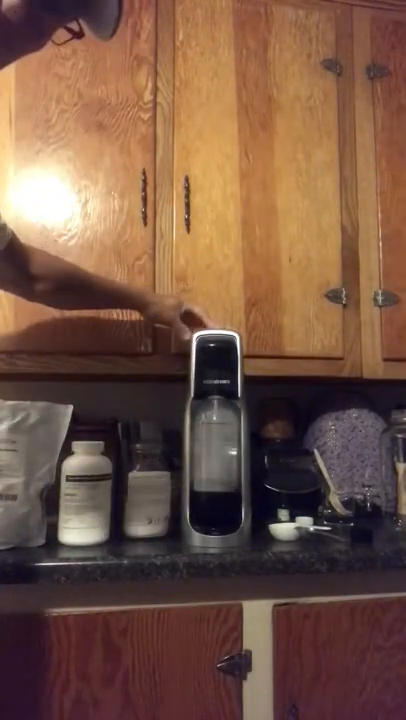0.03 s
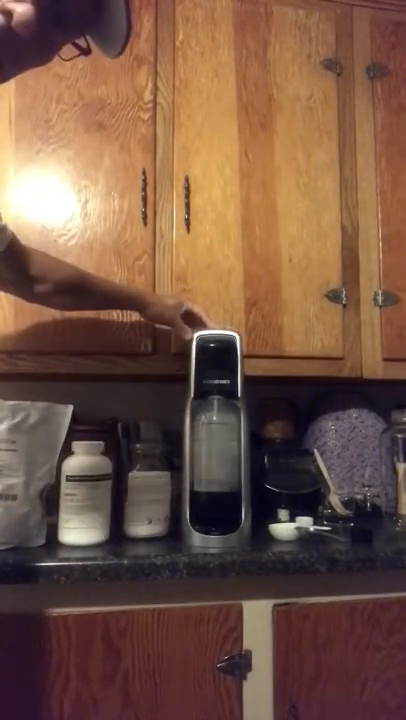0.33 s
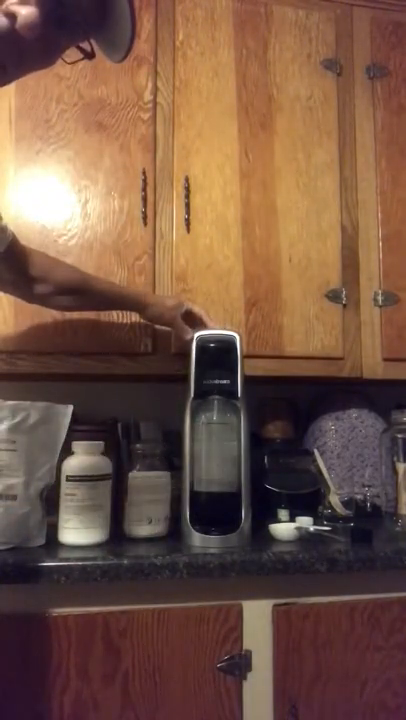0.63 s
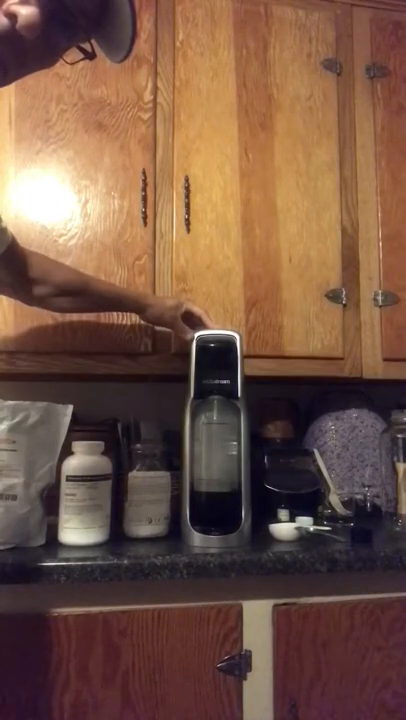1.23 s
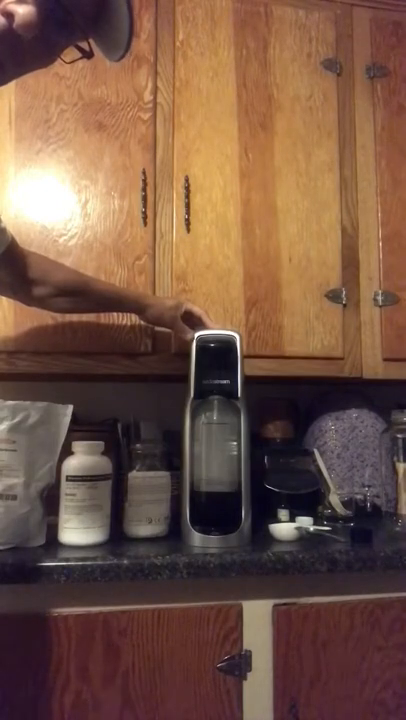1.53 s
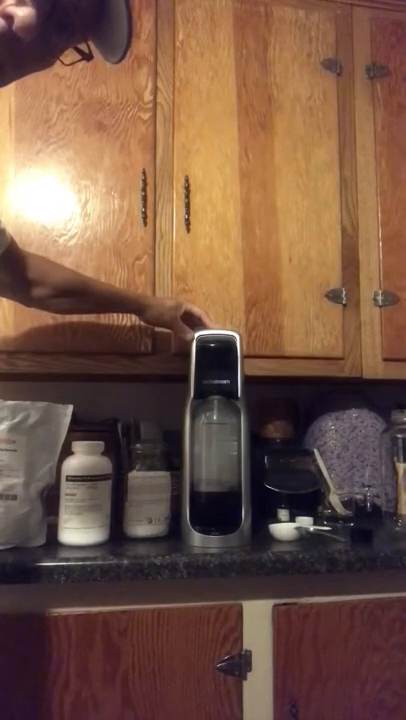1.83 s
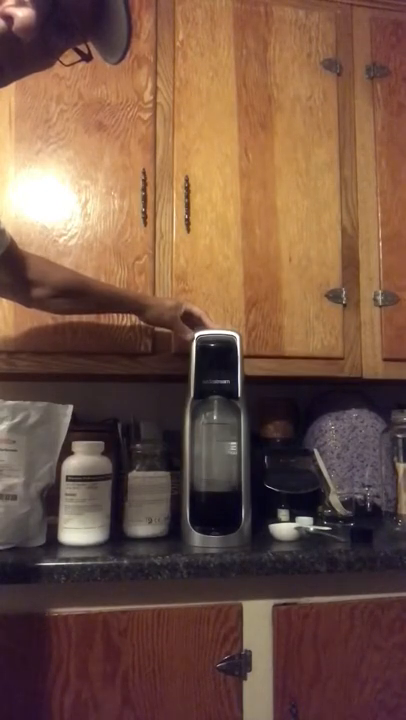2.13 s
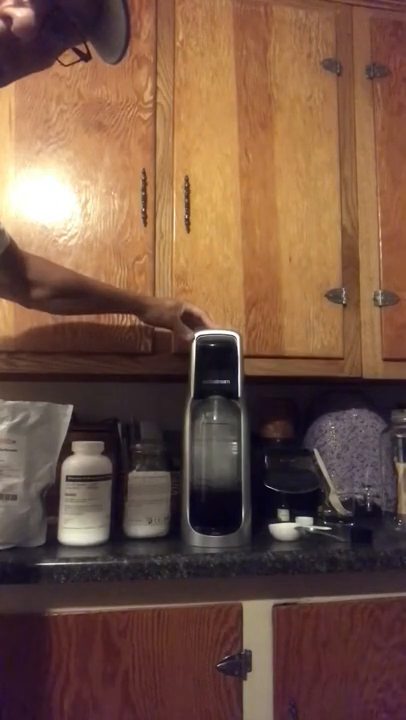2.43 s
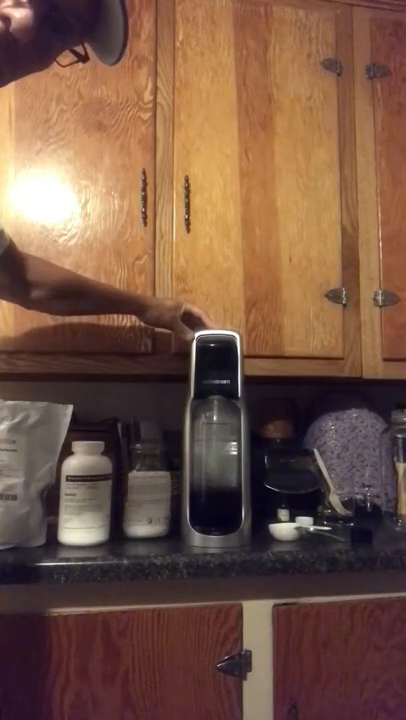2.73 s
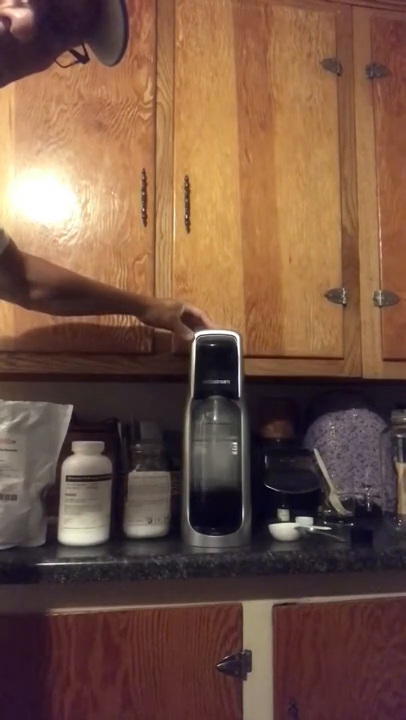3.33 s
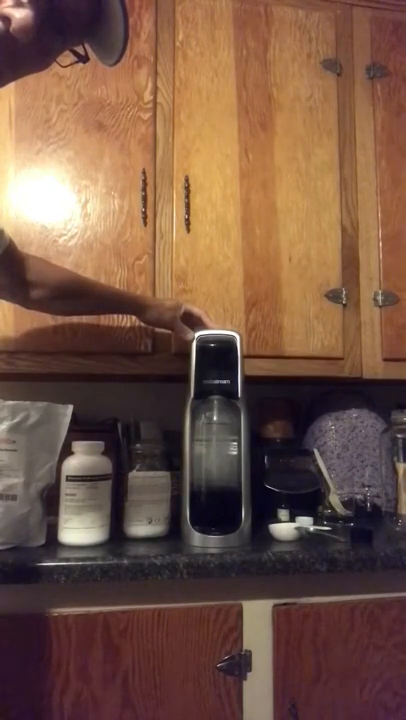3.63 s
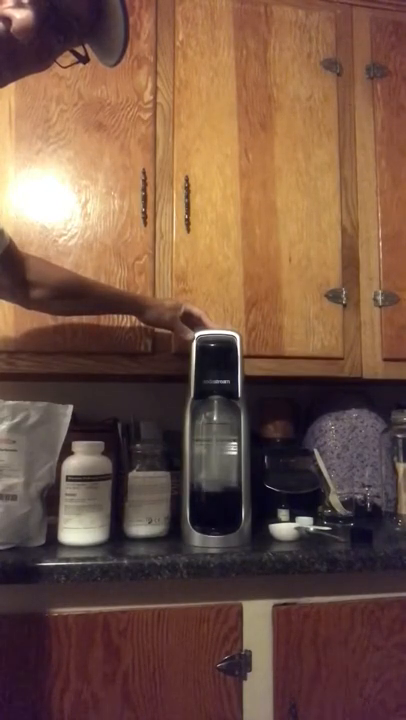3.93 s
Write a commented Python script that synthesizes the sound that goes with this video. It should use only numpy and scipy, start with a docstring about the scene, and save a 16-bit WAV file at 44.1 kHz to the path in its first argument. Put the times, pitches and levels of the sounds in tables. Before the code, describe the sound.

Gas from a soda maker bubbles through bottled water in a small kitchen. Larger ringing bubbles gurgle at first, then give way to brighter fizzing and brief spurts, over a faint valve hiss.

```python
"""A jet of gas from a countertop carbonator breaks into a dense, spluttering cloud of ringing bubbles
in a bottle of water. As pressure builds, the large bubbles thin out and the fine fizz grows.
Each bubble is a short, damped tone, coloured by the bottle and a small kitchen.
Behind the jet the valve hisses thinly, the water churns, and mains hum lies underneath."""
import sys
import numpy as np
from scipy import signal
from scipy.fft import rfft, irfft, next_fast_len
from scipy.io import wavfile
from scipy.ndimage import uniform_filter1d, map_coordinates

SR = 44100
rng = np.random.default_rng(int(sys.argv[2]) if len(sys.argv) > 2 else 0)


def digitize_waveform(pressure):
    """Quantize a signal to 16-bit integers and store it at the path in sys.argv[1].

    Rows of a 2-D input are taken as channels; values are limited to [-1, 1].
    """
    field = np.atleast_2d(pressure).T
    bounded = np.clip(field, -1, 1)
    quanta = np.round(bounded * 32767).astype(np.int16)
    wavfile.write(sys.argv[1], SR, quanta)


N = 176400


def amp(db):
    """Gain of a level in dB."""
    return 10 ** (np.asarray(db) / 20)


def unit(x):
    """x at rms 1."""
    return x / np.sqrt(np.mean(x ** 2) + 1e-20)


def along(points, hz):
    """A curve of (f/Hz, value) points, read on a log frequency axis."""
    freqs, values = np.transpose(points)
    return np.interp(np.log(hz + 1), np.log(freqs + 1), values)


def clock():
    """Time of every sample in seconds."""
    return np.arange(N) / SR


def fader(rows):
    """Gain per sample from (t/s, level/dB) breakpoints."""
    return amp(np.interp(clock(), *np.transpose(rows)))


def swell(s, sigma_s):
    """A bell-shaped envelope centred on time s."""
    return np.exp(-.5 * ((clock() - s) / sigma_s) ** 2)


def wobble(rate):
    """Smooth random modulation, rate knots a second."""
    return map_coordinates(rng.standard_normal(4096), [np.arange(N) * rate / SR], mode="wrap")


def filtered(x, response):
    """x through a frequency response."""
    size = next_fast_len(N + SR // 4)
    return irfft(rfft(x, size) * response(np.fft.rfftfreq(size, 1 / SR)), size)[:N]


def coloured(x, eq):
    """x through an EQ curve, rolled off an octave above its last point, at rms 1."""
    return unit(filtered(x, lambda hz: amp(along(eq, hz)) / (1 + (hz / (2 * eq[-1][0])) ** 10)))


def noise_band(hz, width_hz):
    """A narrow, ringing band of noise at rms 1."""
    phase = 2 * np.pi * np.cumsum(hz * np.ones(N)) / SR
    return unit(wobble(width_hz) * np.cos(phase) + wobble(width_hz) * np.sin(phase))


def glide(start, end, from_hz, to_hz, width_hz):
    """A band of noise that swells and fades while its pitch slides."""
    t = np.arange(max(int((end - start) * SR), 2)) / SR
    progress = t / t[-1]
    a, b = (map_coordinates(row, [t * width_hz], mode="wrap") for row in rng.standard_normal((2, 512)))
    phase = 2 * np.pi * np.cumsum(from_hz + (to_hz - from_hz) * progress) / SR
    band = np.sin(np.pi * progress) * unit(a * np.cos(phase) + b * np.sin(phase))
    return np.bincount(max(int(start * SR), 0) + np.arange(len(t)), band, N)[:N]


def clustered(x, depth_db=1.8):
    """Bubbles of like size come in clusters: brief patches of random gain in time and pitch."""
    spectra = signal.stft(x, nperseg=512)[2]
    patches = uniform_filter1d(rng.standard_normal(spectra.shape), size=5, axis=0)
    patches = uniform_filter1d(patches, size=4, axis=1)
    return unit(signal.istft(spectra * amp(depth_db * unit(patches)), nperseg=512)[1][:N])


def climbing(x, share):
    """Varispeed: the pitch of x drifts up by a share over its whole length."""
    progress = clock() / (N / SR)
    return map_coordinates(x, [N * (progress + share * progress * (progress - 1) / 2)], mode="wrap")


def steadied(x, window_s=.07):
    """A leveller, slower than the splutter: holds x near rms 1 so that a fader sets its swells."""
    power = uniform_filter1d(x ** 2, size=int(window_s * SR))
    power = uniform_filter1d(power, size=int(window_s * SR / 2))
    return x / np.sqrt(np.abs(power) + 1e-9)


# Reverb time of the kitchen: f/Hz, t60/s
KITCHEN_DECAY = [(200, 0.99), (2000, 0.26), (10000, 0.23)]


def kitchen(x, wet_db=-2):
    """Adds a short, diffuse kitchen reverb, its noise tail renewed every half second."""
    mix = np.pad(x, (0, SR))
    for s in np.arange(0, N / SR + .5, .5):
        hz, t, spectra = signal.stft(rng.standard_normal(SR // 4), SR, nperseg=256)
        decay = amp(-60 * t / along(KITCHEN_DECAY, hz)[:, None])
        tail = signal.istft(spectra * decay, SR, nperseg=256)[1]
        near = np.arange(max(int((s - .5) * SR), 0), min(int((s + .5) * SR), N))
        send = np.sqrt(np.clip(1 - 2 * np.abs(near / SR - s), 0, 1))  # equal-power crossfade
        echo = signal.fftconvolve(x[near] * send, tail / np.linalg.norm(tail))
        mix[near[0]:near[0] + len(echo)] += amp(wet_db) * echo
    return unit(mix[:N])


# Mains partials: f/Hz, level/dB
HUM_PARTIALS = [(59, -72.5), (118.5, -70.5)]


def hum():
    """Mains hum of a kitchen appliance over a faint room rumble."""
    tones = sum(np.sqrt(2) * amp(db) * np.sin(2 * np.pi * hz * clock() + 0.12 * wobble(6.1))
                for hz, db in HUM_PARTIALS)
    rumble_eq = [(20, 7.0), (52, 4.5), (72, 4), (130, 11), (200, -13), (500, -18.5)]
    return tones + amp(-70) * coloured(rng.standard_normal(N), rumble_eq)


# Churn fader, before trim: t/s, level/dB
CHURN_FADER = [(0, -63), (1.0, -63.5), (2.2, -63), (2.6, -66)]
# Body of the churn: f/Hz, relative level/dB
CHURN_EQ = [(20, -18), (55, -6), (75, -15), (150, -1), (230, 2.5), (440, -3), (560, 8.5), (630, -1),
            (705, -2), (880, -6.5), (1100, -15), (2000, -15)]
# Low drones: f/Hz, width/Hz, level/dB, peak t/s, sigma/s
WATER_DRONES = [(365, 14, -69.5, 2.55, 1.3), (260, 30, -67.5, 0.57, 0.79), (695, 52, -64.5, 0.3, 0.4)]


def water():
    """Churning water: a low bed of noise, narrow swelling drones and one soft bump."""
    churn = amp(0.5) * fader(CHURN_FADER) * coloured(rng.standard_normal(N), CHURN_EQ)
    drones = sum(amp(db) * swell(s, sigma) * noise_band(hz, width)
                 for hz, width, db, s, sigma in WATER_DRONES)
    bump = amp(-59) * swell(s=0.89, sigma_s=0.035) * np.sin(2 * np.pi * 33 * clock())
    return churn + drones + bump


# Swells of the bottle's ring: t/s, peak level/dB, sigma/s
BOTTLE_THROBS = [(.77, -64, 0.033), (2.26, -60.5, 0.054), (2.622, -61.5, 0.055)]


def bottle(ring_hz=374):
    """The lowest ring of the bottle throbs now and then."""
    envelope = sum(amp(db) * swell(s, sigma) for s, db, sigma in BOTTLE_THROBS)
    return envelope * np.sin(2 * np.pi * ring_hz * clock() + 0.46 * wobble(18))


# Hiss fader, before trim and flutter: t/s, level/dB
VALVE_FADER = [(0, -65.5), (0.7, -68.5), (1.9, -66.5), (2.7, -62.5), (2.95, -66), (4.0, -62.5)]
# Airy top of the hiss: f/Hz, relative level/dB
VALVE_EQ = [(5000, -20), (7000, -9), (8000, -6.5), (9200, 0), (9800, -3), (10650, -5), (11000, 2),
            (11650, .5), (11870, -6), (12500, -6), (13200, -9), (14100, -12), (15200, -9), (16000, -12)]


def valve():
    """Thin, fluttering hiss of gas passing the valve."""
    hiss = clustered(coloured(kitchen(rng.standard_normal(N)), VALVE_EQ), depth_db=1.5)
    return fader(VALVE_FADER) * amp(1.15 + 1.2 * wobble(38)) * hiss


# Spray cues: t/s, f/Hz, level/dB
SPRAY_CUES = [(.285, 12400, -69), (.855, 10700, -68), (1.465, 9160, -59), (2.265, 10080, -64),
              (3.23, 9600, -65)]


def sprays(length_s=0.059, rise=.03):
    """Tiny sprays of bursting bubbles, each a bright upward chirp of noise."""
    return sum(amp(db) * glide(s - length_s / 2, s + length_s / 2, hz, hz * (1 + rise), width_hz=740)
               for s, hz, db in SPRAY_CUES)


# Solo bubbles: t/s, f/Hz, peak level/dB, sigma/s
SINGER_CUES = [(0.402, 1470, -38, 0.021), (0.572, 1483, -40, 0.028), (2.816, 1476, -46, 0.012),
               (3, 3400, -31.5, 0.0098), (3.226, 1494, -49.5, 0.03), (3.484, 1490, -44.5, 0.011),
               (3.685, 5470, -41, 0.0054), (3.871, 5450, -38, 0.0054)]


def singing_bubbles():
    """Now and then a bubble rings out of the cloud on one wavering pitch."""
    return sum(amp(db) * swell(s, sigma) * np.sin(2 * np.pi * hz * clock() + 0.82 * wobble(90))
               for s, hz, db, sigma in SINGER_CUES)


# Resonant sweeps: start t/s, end t/s, from f/Hz, to f/Hz, width/Hz, level/dB
FOAM_SWEEPS = [(.015, 0.096, 4200, 3140, 520, -41), (.125, 0.32, 3100, 3700, 440, -47),
               (.28, .41, 3000, 4100, 560, -41), (.1, 1.75, 1080, 1330, 120, -52.5),
               (1.6, 2.14, 2300, 2520, 190, -43), (1.98, 2.36, 2500, 2850, 240, -49.5),
               (1.85, 2.4, 1950, 2150, 180, -56.5), (2.46, 2.62, 2150, 2500, 160, -46)]


def foam():
    """Resonances glide as the gas pocket and the foam change size."""
    return sum(amp(db) * glide(*sweep) for *sweep, db in FOAM_SWEEPS)


def bubbles(eq, cycles, chirp, count, spread_db=3.0):
    """A swarm of rising bubble tones, damped by 60 dB per `cycles` periods, through room and bottle EQ."""
    when, pitch, rank = rng.random((count, 3)).T
    hz = (eq[0][0] + pitch * (eq[-1][0] - eq[0][0]))[:, None]
    t = np.arange(SR // 150) / SR
    age = hz * t / cycles
    accent_db = -spread_db * np.log(np.maximum(1 - rank, np.exp(-4)))  # many soft, a few loud
    strength = amp(accent_db)[:, None] * np.sqrt(hz)
    tones = strength * amp(-60 * age) * np.sin(2 * np.pi * hz * t * (1 + chirp * age))
    place = (when * N).astype(int)[:, None] + np.arange(len(t))
    swarm = np.bincount(place.ravel(), tones.ravel(), N)[:N]
    return coloured(kitchen(swarm), eq)


# Large-bubble fader, before trim: t/s, level/dB
LARGE_FADER = [(0, -36), (0.15, -46.5), (0.26, -42), (0.5, -44.5), (0.7, -48), (1.65, -47), (2.05, -51),
               (2.55, -55), (3.1, -54.5), (4.0, -55)]
# Their tone at low and at high pressure: f/Hz, relative level/dB
LOW_PRESSURE_EQ = [(600, -19), (950, -13), (1100, -4.5), (1190, -8.5), (1270, -4), (1370, -5), (1480, 0.5),
                   (1590, -9), (1680, 3.5), (1760, -2.5), (1860, -8.5), (2300, -8)]
HIGH_PRESSURE_EQ = [(700, -21), (1100, -8), (1200, -6.5), (1280, 4), (1370, -3), (1490, 9.5), (1590, -2),
                    (1750, 2.5), (1900, 1), (2300, -33)]


def large_bubbles(start_s=0.76, end_s=1.79):
    """The largest bubbles vanish as pressure builds: an equal-power crossfade of two swarms."""
    pressure = np.clip((clock() - start_s) / (end_s - start_s), 0, 1)
    early = bubbles(LOW_PRESSURE_EQ, cycles=11.4, chirp=0.037, count=4000)
    late = bubbles(HIGH_PRESSURE_EQ, cycles=9.1, chirp=0.081, count=4000)
    blend = np.sqrt(1 - pressure) * early + np.sqrt(pressure) * late
    return amp(-1.68) * fader(LARGE_FADER) * clustered(blend)


# Gurgle fader, before trim: t/s, level/dB
GURGLE_FADER = [(0, -46), (0.19, -45.5), (0.23, -34), (0.3, -38), (0.4, -41), (0.6, -36), (0.85, -42),
                (1.1, -41), (1.5, -44), (1.9, -43), (2.2, -45.5), (2.45, -47.5), (2.53, -48.5),
                (2.95, -45.5), (3.35, -53), (3.56, -53.5), (3.62, -47.5), (4.0, -51)]
# Gurgle through the bottle: f/Hz, relative level/dB
GURGLE_EQ = [(1400, -32.5), (1850, -16.5), (2000, -5.5), (2130, -5.5), (2230, -4), (2370, 2.5), (2470, 1),
             (2570, -1), (2750, -4), (3000, -16), (3400, -45)]


def gurgle():
    """Mid-sized bubbles ring in the midrange, surging early and easing off."""
    swarm = clustered(bubbles(GURGLE_EQ, cycles=22, chirp=0.075, count=10000))
    return amp(0.16) * fader(GURGLE_FADER) * steadied(swarm)


# Fizz fader, before trim: t/s, level/dB
FIZZ_FADER = [(0, -66), (0.15, -66.5), (0.5, -60), (0.8, -61), (1.1, -51.5), (1.9, -52.5), (2.5, -53),
              (2.63, -45), (2.78, -49), (2.87, -53.5), (3.05, -48), (3.3, -51.5), (3.45, -53.5),
              (3.7, -50.5), (3.88, -47), (4.0, -48.5)]
# Fizz through the bottle: f/Hz, relative level/dB
FIZZ_EQ = [(4000, -41), (4900, -2), (5400, -1), (5800, -8), (6500, -8), (7050, -12), (7400, -26.5),
           (7800, -36), (9500, -44)]


def fizz():
    """The finest bubbles ring highest, growing louder and creeping up in pitch."""
    swarm = clustered(bubbles(FIZZ_EQ, cycles=83, chirp=0.13, count=9000))
    return amp(.8) * fader(FIZZ_FADER) * steadied(climbing(swarm, share=.05))


# Faders for the cloud's top, riding the gas flow, and its lower edge, before trim: t/s, level/dB
FLOW_FADER = [(0, -44), (0.15, -47), (0.2, -42.5), (0.29, -36), (0.44, -37), (0.51, -33.5), (0.6, -35),
              (0.69, -32), (0.77, -34), (0.83, -37), (1.0, -32), (1.2, -36.5), (1.33, -34), (1.4, -36.5),
              (1.46, -34), (1.56, -37), (1.63, -35), (1.83, -35.5), (1.88, -37.5), (1.98, -36.5),
              (2.04, -37.5), (2.17, -35), (2.25, -39), (2.37, -34), (2.44, -37.5), (2.61, -40), (2.64, -31),
              (2.69, -34), (2.8, -35.5), (2.88, -41), (2.94, -36.5), (3.08, -37), (3.12, -38.5),
              (3.27, -33), (3.39, -40.5), (3.43, -39), (3.5, -43.5), (3.56, -43), (3.6, -39.5),
              (3.73, -42.5), (3.77, -40), (3.82, -42), (3.9, -40.5), (4.0, -44.5)]
EDGE_FADER = [(0, -44.5), (0.17, -51), (0.26, -38.5), (0.45, -42.5), (0.66, -38.5), (0.88, -41),
              (0.97, -38), (1.1, -40.5), (1.75, -43.5), (2.25, -49.5), (2.4, -44.5), (2.58, -50),
              (3.0, -45), (3.3, -46.5), (3.47, -53), (3.88, -46), (4.0, -54)]
# Spurts of gas: t/s, peak level/dB, sigma/s
GAS_SPURTS = [(.69, -37, .012), (.78, -37, .009), (1.23, -38, .008), (2.654, -26.5, .003),
              (2.708, -35, .005), (2.806, -34, .007), (3.168, -36, .004), (3.59, -40, .008),
              (3.752, -35.5, .006)]
# Cloud through the bottle: f/Hz, relative level/dB
CLOUD_EQ = [(2200, -72), (2750, -16.5), (3000, -9.5), (3300, -5.5), (3600, -3.5), (4100, -0.5), (4500, -2),
            (4750, -6.5), (5200, -16), (5700, -26), (7500, -44)]


def cloud(splutter, crossover_hz=3280):
    """The main bubble cloud follows the flow and its spurts; its lower edge surges early, then thins."""
    spurt_power = sum((amp(db) * swell(s, sigma)) ** 2 for s, db, sigma in GAS_SPURTS)
    flow = np.sqrt((amp(0.43) * splutter * fader(FLOW_FADER)) ** 2 + spurt_power)
    swarm = clustered(bubbles(CLOUD_EQ, cycles=63, chirp=.02, count=16000), depth_db=2.6)
    swarm = climbing(swarm, share=.04)  # pitch climbs as pressure builds
    edge = filtered(swarm, lambda hz: 1 / (1 + (hz / crossover_hz) ** 60))
    edge_gain = amp(-1.86) * splutter * fader(EDGE_FADER)
    return flow * steadied(swarm - edge) + edge_gain * steadied(edge)


def jet():
    """Gas from the nozzle breaks into foam and four sizes of bubble; fizz and cloud splutter together."""
    splutter = amp(0.4 * wobble(rate=68))
    return gurgle() + large_bubbles() + splutter * fizz() + foam() + cloud(splutter)


def scene():
    """One mono mix on both channels."""
    mix = jet() + singing_bubbles() + valve() + sprays() + water() + bottle() + hum()
    return np.tile(mix, (2, 1))


def record(dry):
    """A brick-wall low-pass trims the very top."""
    return np.array([filtered(side, lambda hz: hz < 15760) for side in dry])


dry = scene()
out = record(dry)
digitize_waveform(out)
```